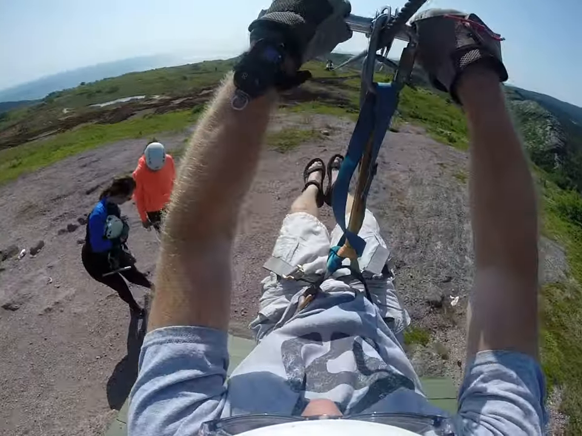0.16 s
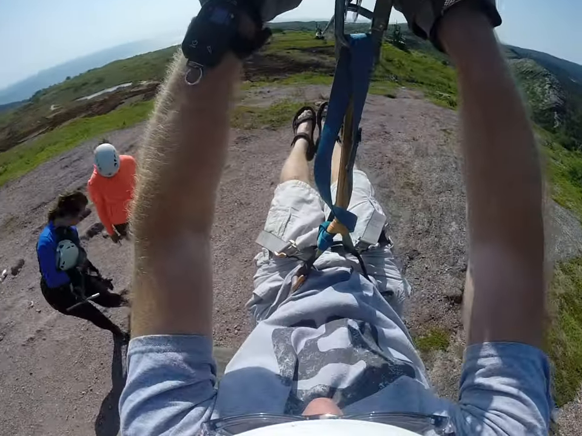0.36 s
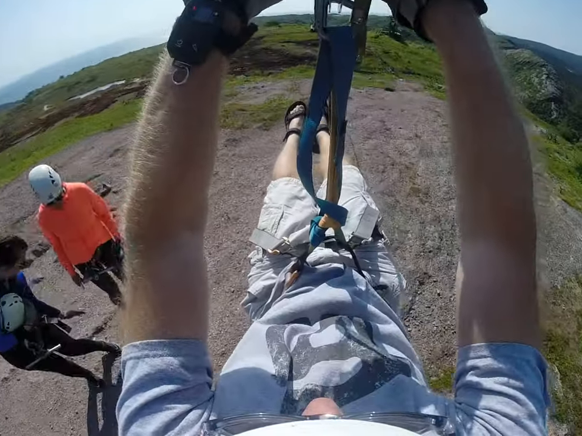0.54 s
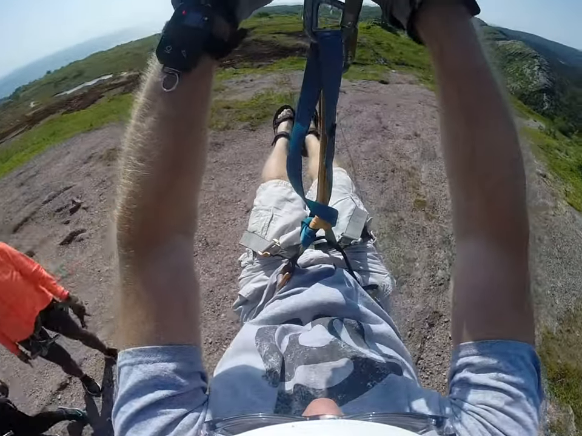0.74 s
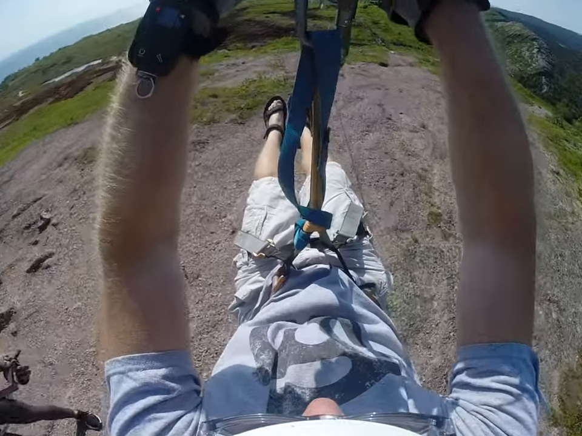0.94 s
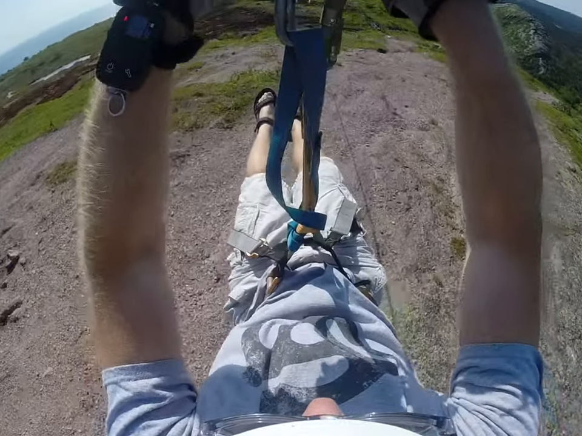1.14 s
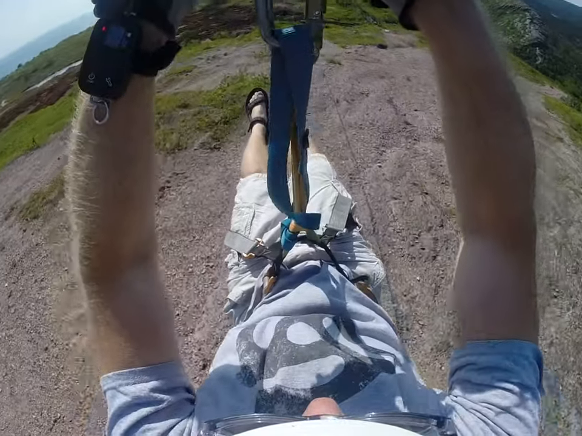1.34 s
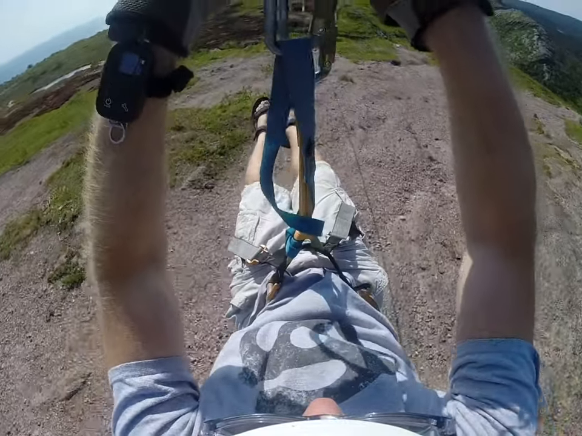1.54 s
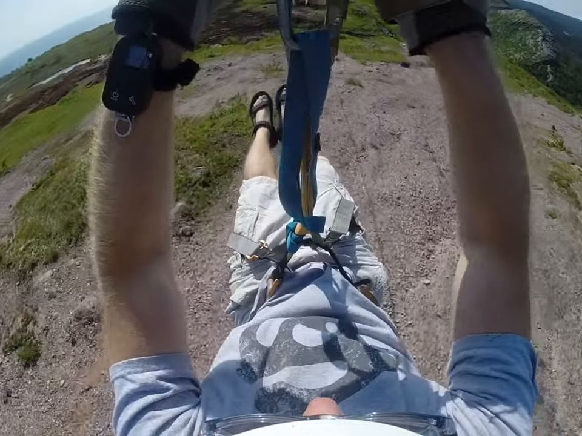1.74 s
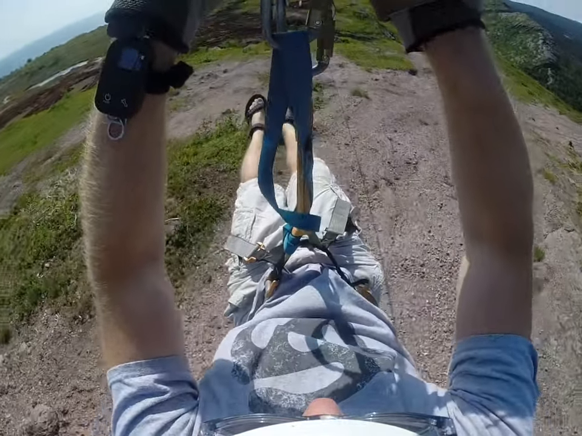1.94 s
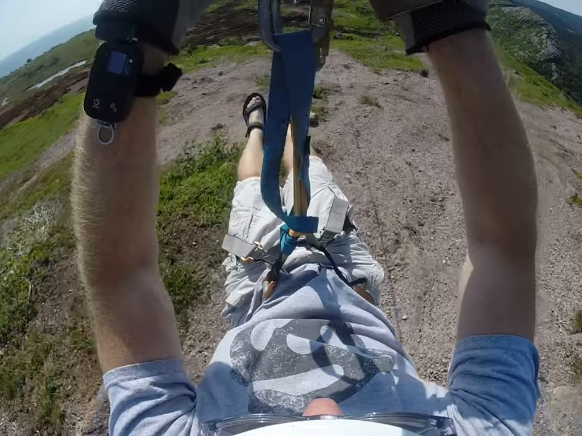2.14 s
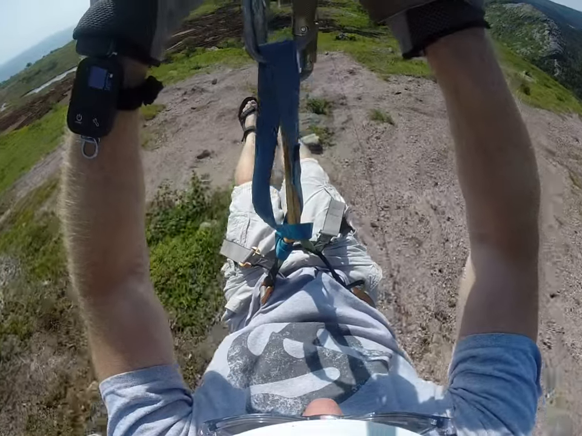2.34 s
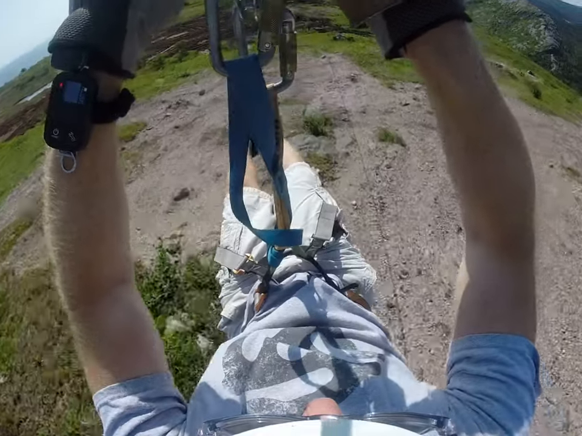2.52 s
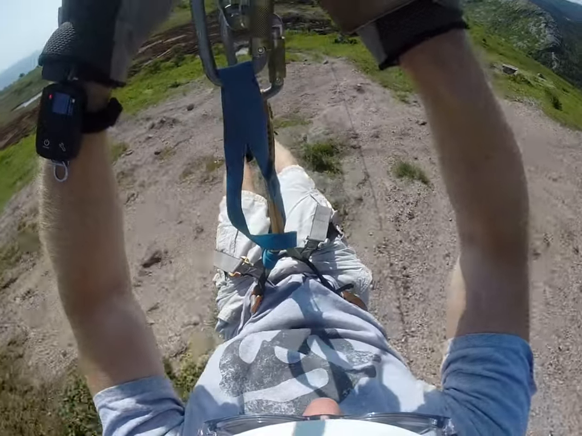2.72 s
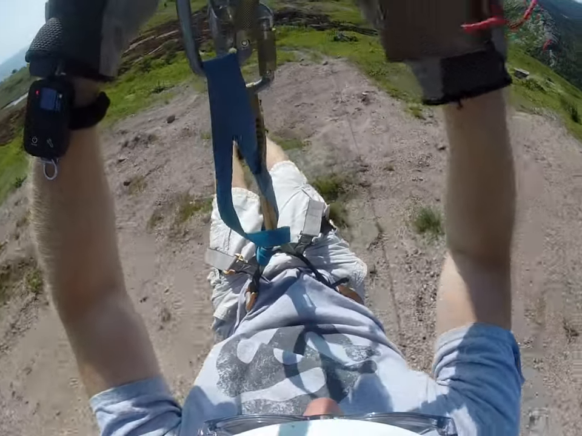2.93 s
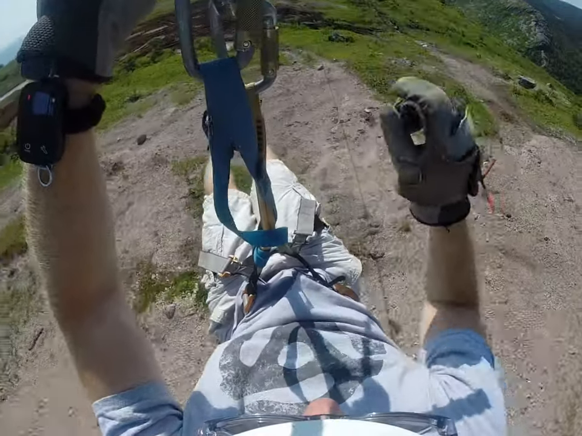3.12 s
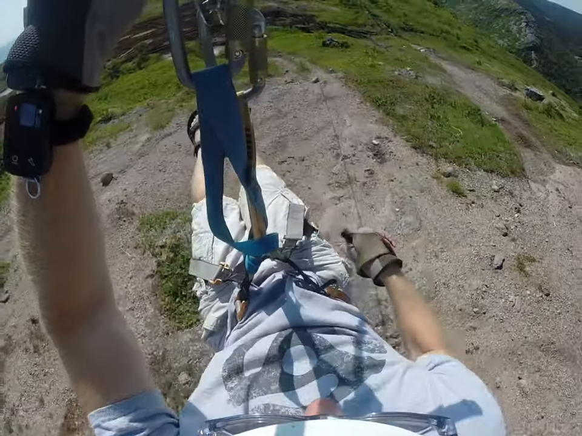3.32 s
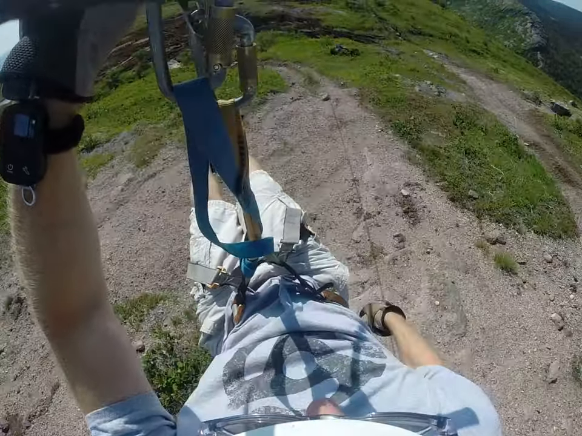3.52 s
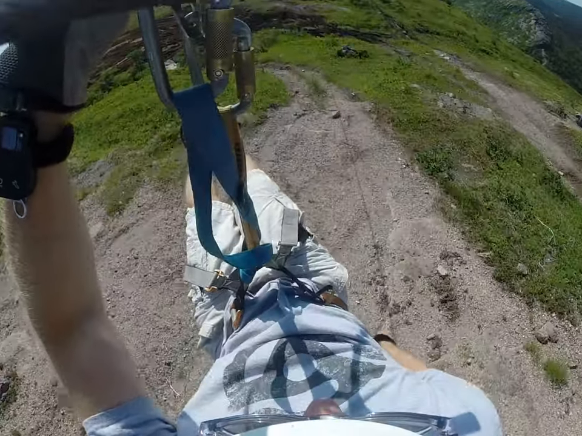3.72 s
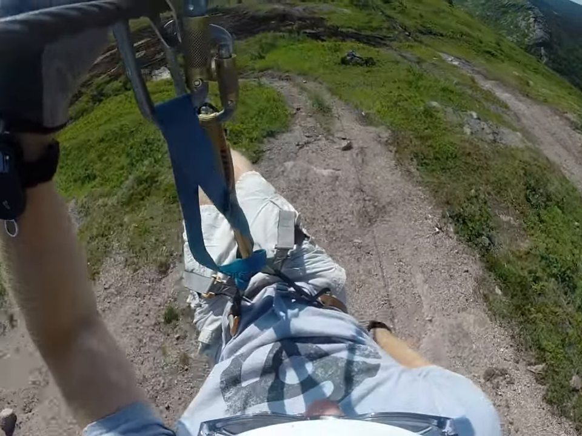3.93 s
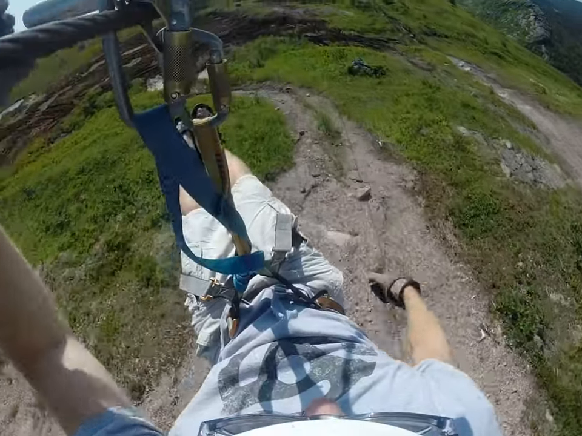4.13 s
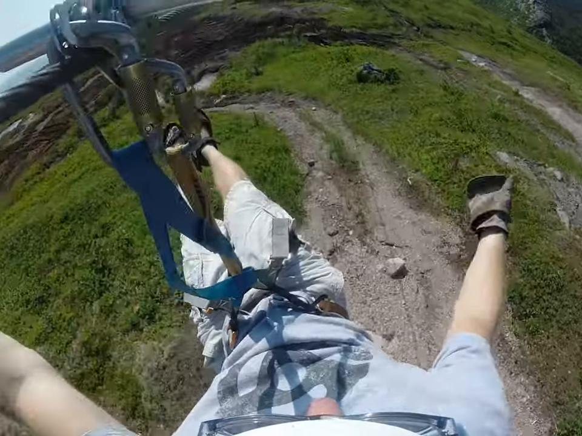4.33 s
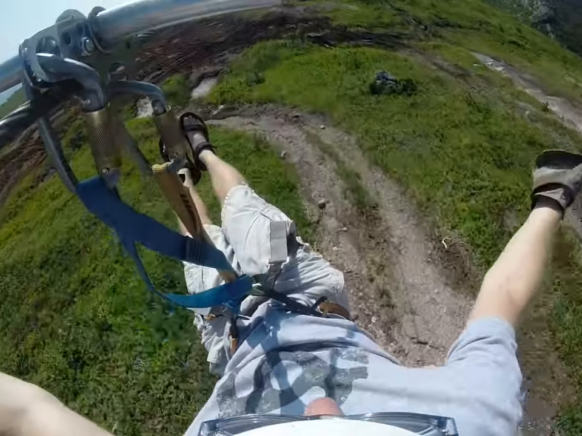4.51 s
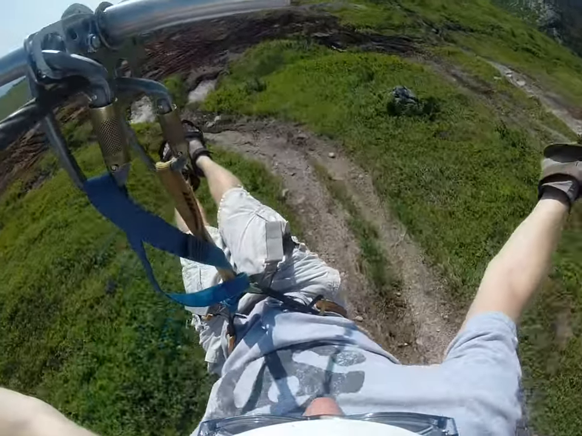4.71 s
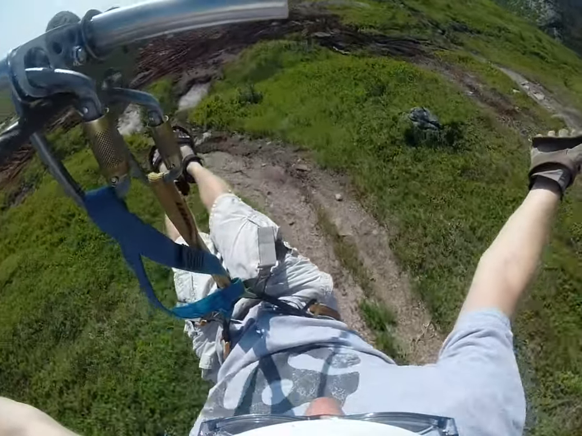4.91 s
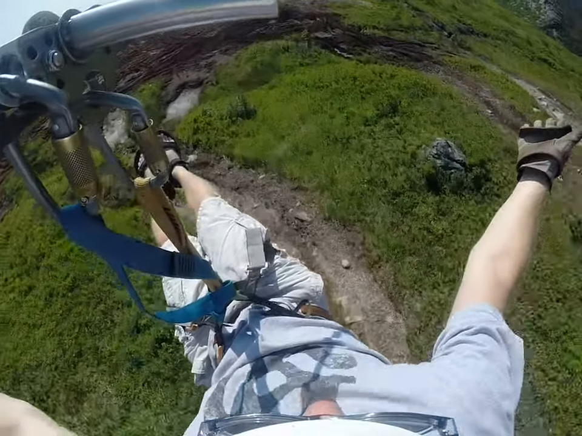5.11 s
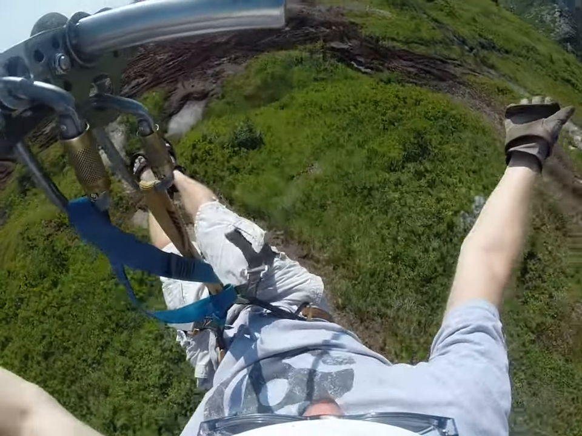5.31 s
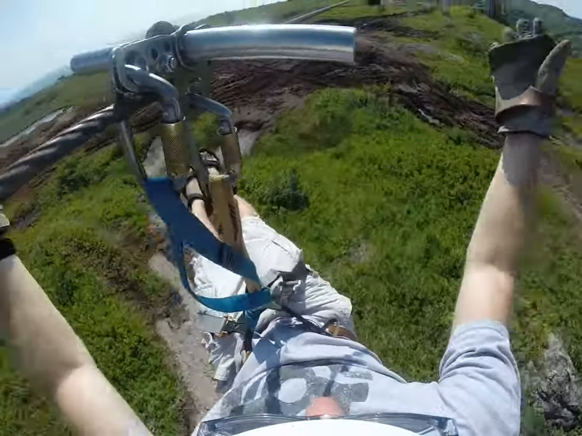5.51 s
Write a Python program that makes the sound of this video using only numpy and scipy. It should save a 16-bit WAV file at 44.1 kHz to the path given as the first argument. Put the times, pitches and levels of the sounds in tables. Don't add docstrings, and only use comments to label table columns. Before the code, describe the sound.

A rider's zip line launch, heard very close and dry: faint harness taps, a knock with a dull thud, a short scrape, then wheels accelerating over twisted cable. The bright, rattling hiss grows quickly and stays loud, changing colour as the head turns, with wind flutter beneath, a piercing whistle around the middle, and a sharp late knock.

```python
import sys
import numpy as np
from scipy import signal
from scipy.fft import rfft, irfft, next_fast_len
from scipy.io import wavfile
from scipy.ndimage import uniform_filter1d, map_coordinates

SR = 44100
rng = np.random.default_rng(int(sys.argv[2]) if len(sys.argv) > 2 else 0)


def ratio_of_db(decibels):
    return 10 ** (np.asarray(decibels, float) / 20)


def persist_wave(psi):
    counts = np.round(np.clip(psi, -1, 1) * 32767).astype(np.int16)
    wavfile.write(sys.argv[1], SR, np.atleast_2d(counts).T)


N = 245195

# start_s [s], facing [-]
HEAD_TURN = [(0, -1.5), (.4, -0.53), (.9, -0.33), (1.3, 0.062), (2.45, 0.12), (2.65, 0.3), (3.1, 0.67),
             (3.5, 1.06), (4.06, 1.4), (4.14, 1.74), (4.4, 2), (5.56, 1.85)]


def unit(x):
    return x / np.sqrt(np.mean(x ** 2) + 1e-20)


def even(x, size):
    power = uniform_filter1d(uniform_filter1d(x ** 2, size=size), size=size)
    return x / np.sqrt(abs(power) + 1e-9)


def curves(rows):
    s, *cols = np.transpose(rows)
    return [np.interp(np.arange(N) / SR, s, c) for c in cols]


def span(start, rise, stop, fall):
    return np.interp(np.arange(N) / SR, [start, start + rise, stop, stop + fall], [0, 1, 1, 0])


def swells(rows):
    t = np.arange(N) / SR
    return sum(ratio_of_db(db) ** 2 * np.exp(-((t - s) / length) ** 2) for s, length, db in rows)


def wobble(rate):
    knots = rng.standard_normal(int(N * rate / SR) + 4)
    return map_coordinates(knots, [np.arange(N) * rate / SR])


def filtered(x, response):
    m = next_fast_len(N + 8192)
    return irfft(rfft(x, m) * response(np.fft.rfftfreq(m, 1 / SR)), m)[:N]


def coloured(spectrum):
    f, db = np.transpose(spectrum)

    def response(hz):
        return ratio_of_db(np.interp(np.log(hz + 1), np.log(f + 1), db))

    return unit(filtered(rng.standard_normal(N), response))


def resonant(x, modes):
    f = np.fft.rfftfreq(4096, 1 / SR)
    power = 0
    for c, w, db in modes:
        power = power + ratio_of_db(db) ** 2 * (f * w) ** 2 / ((c * c - f * f) ** 2 + (f * w) ** 2)
    below = 1 + (modes[0][0] * 0.96 / (f + 1)) ** 16
    above = 1 + (f / (modes[-1][0] * 1.045)) ** 14
    cepstrum = irfft(np.log(power / (below * above) + 1e-14) / 2)
    cepstrum = cepstrum * np.r_[1, np.full(2047, 2), 1, np.zeros(2047)]
    ringing = irfft(np.exp(rfft(cepstrum)))
    return unit(signal.oaconvolve(x, ringing)[:N])


def wind():
    # start_s [s], level_db [dB]
    airflow = [(0, -63), (.1, -66.5), (.4, -58), (.68, -56.5), (2.0, -55), (2.5, -56), (3.3, -53.5),
               (3.8, -51), (4.0, -53.5), (4.5, -51.5), (5.06, -47.5), (5.56, -49)]
    # pitch_hz [Hz], level_db [dB per Hz]
    sway_colour = [(3, -16), (9, 5.5), (16, -3.5), (26, -10), (40, -76)]
    buffet_colour = [(18, -25), (30, -4.5), (50, -4.5), (68, -12.5), (100, -14.5), (125, -25), (170, -63)]
    flutter_colour = [(79, -8), (135, 4.5), (173, -2.5), (210, 1.5), (259, -7), (450, -18), (580, -24),
                      (990, -120)]
    rush_colour = [(210, -8.5), (350, -6.5), (571, -10.5), (808, -5.5), (1160, -8.5), (1250, -13),
                   (1620, -7.5), (2750, -120)]
    # peak_s [s], length_s [s], sway_db [dB], buffet_db [dB]
    gusts = [(.0, 0.061, -37.5, -47), (.4, 0.062, -41, -50), (0.677, .12, -33.5, -50),
             (.96, 0.14, -36.5, -48), (1.233, 0.039, -35, -46), (1.457, 0.072, -32.5, -35.5),
             (1.75, 0.14, -42, -38), (2.088, 0.1, -35, -43.5), (2.4, 0.16, -44, -42.5),
             (2.896, 0.082, -38.5, -43), (3.737, 0.11, -50, -40.5), (4.17, 0.11, -38.5, -37.5),
             (4.703, .1, -39, -40), (5.045, 0.1, -51, -35.5), (5.3, .07, -44, -38), (5.51, .07, -38, -41)]

    rush_db, = curves(airflow)
    flow_db = rush_db - rush_db.mean()
    sway_gusts = swells([g[:3] for g in gusts])
    buffet_gusts = swells([(s, length, db) for s, length, _, db in gusts])
    sway = np.sqrt(ratio_of_db(-47 + 0.12 * flow_db) ** 2 + sway_gusts)
    buffet = np.sqrt(ratio_of_db(-43 + 0.86 * flow_db) ** 2 + buffet_gusts)
    low = sway * even(coloured(sway_colour), size=9000)
    low = low + buffet * even(coloured(buffet_colour), size=5000)
    faster_db = 1 * (np.arange(N) - N / 2) / SR
    flutter_db = -54.5 + 1.08 * flow_db + faster_db + wobble(9)
    flutter = ratio_of_db(flutter_db) * coloured(flutter_colour)
    rush = ratio_of_db(rush_db + 0.24 * wobble(13)) * coloured(rush_colour)
    return low + flutter + rush


def knocks():
    hits = [
        (.034, -53, 1770, 900, 700),
        (.079, -52, 1800, 1300, 900),
        (.231, -56, 1700, 1200, 890),
        (.322, -50, 1650, 900, 900),
        (.353, -49, 1480, 900, 1100),
        (.3985, -35, 1800, 1100, 1000),
        (.405, -42, 1370, 1006, 900),
        (4.4725, -31.5, 970, 1300, 800),
        (4.474, -34, 1220, 1500, 900),
    ]
    out, t = np.zeros(N + SR), np.arange(SR // 4) / SR
    for s, db, ring_hz, puff_hz, spread_hz in hits:
        edges_hz = [puff_hz - spread_hz / 1.7, puff_hz + spread_hz / 2]
        band = signal.butter(2, edges_hz, "band", fs=SR)
        puff = unit(signal.lfilter(*band, rng.standard_normal(len(t))))
        puff = 0.53 * ratio_of_db(-60 * t / 0.041) * puff
        ring = ratio_of_db(-60 * t / 0.031) * np.sin(2 * np.pi * ring_hz * t)
        out[round(s * SR):][:len(t)] += ratio_of_db(db + 0.5) * (ring + puff)
    return out[:N]


def helmet_bumps():
    bumps = [
        (0.402, -26.5, 99, 0.11),
        (.9, -42.5, 208, 0.22),
        (.92, -36, 104, 0.22),
        (2.66, -34, 100, 0.24),
        (3.819, -38, 204, 0.33),
        (3.84, -35, 99, 0.22),
    ]
    out, t = np.zeros(N + SR), np.arange(SR // 4) / SR
    for s, db, hz, t60 in bumps:
        onset = 1 - np.exp(-t / 0.011)
        out[round(s * SR):][:len(t)] += ratio_of_db(db - 60 * t / t60) * onset * np.sin(2 * np.pi * hz * t)
    return out[:N]


def strap_scrape():
    # pitch_hz [Hz], width_hz [Hz], level_db [dB]
    strap = [(1500, 120, -11), (1800, 51, 3), (1990, 22, -2), (2340, 47, -6)]
    start_s, grab_s, drag_s, slip_db_per_s = 0.413, 0.023, 0.055, 166
    slips = ratio_of_db(1.5 * wobble(90)) * rng.standard_normal(N)
    freed_s = np.clip(np.arange(N) / SR - start_s - grab_s - drag_s, 0, None)
    drag = span(start_s, grab_s, start_s + 0.16, 0.067) * ratio_of_db(-38 - slip_db_per_s * freed_s)
    return drag * resonant(slips, strap)


def squeal():
    # peak_s [s], level_db [dB]
    flares = [(3.03, -38), (3.21, -36), (3.37, -34.5), (3.48, -31), (3.57, -31), (3.69, -41), (3.81, -34),
              (3.89, -45), (4.01, -29.5), (4.1, -31), (4.38, -51), (4.8, -43), (5.12, -48), (5.4, -46)]
    squeal_hz, ease_s, fade_s = 7080, 4.39, .05
    pitch_hz = squeal_hz + 3 * wobble(14) + 18 * wobble(90)
    whistle = np.sin(2 * np.pi * np.cumsum(pitch_hz) / SR)
    fuzz = .45 * resonant(rng.standard_normal(N), [(squeal_hz, 60, 0)])
    sing = ratio_of_db(-38) * span(2.92, .3, ease_s, fade_s)
    linger = ratio_of_db(-52) * span(ease_s, fade_s, 5.45, fade_s)
    flare_power = swells([(s, 0.026, db) for s, db in flares])
    loudness = np.sqrt((sing + linger) ** 2 + flare_power)
    return loudness * ratio_of_db(5.0) * (whistle + fuzz)


def heard(x, modes, lag_s=0):
    facing, = curves([(s + lag_s * np.clip(turn - 1, 0, 1), turn) for s, turn in HEAD_TURN])
    states = [[(m[0], m[1], 1.5 * m[2]) for m in modes]]
    for k in range(3):
        states.append([(m[0], m[1], m[2 + k]) for m in modes])
    mix = np.zeros(N)
    for k, state in enumerate(states):
        share = np.clip(1 - abs(facing + 1 - k), 0, 1)
        mix += share * resonant(x, state)
    return even(mix, size=9000)


def contact(lay, lay_db, bump_db, grit_db):
    twist = lay_db * np.cos(2 * np.pi * lay) * (1 + .5 * wobble(3.23))
    bumps = bump_db * (wobble(45) + 0.95 * wobble(14))
    return unit(ratio_of_db(twist + bumps + grit_db * wobble(500)) * rng.standard_normal(N))


def ticks(passed):
    step = np.floor(passed + .03 * wobble(300))
    strand_db = np.array([12.5, -7.0, 1, 9.5, 5.5, -4])
    height = ratio_of_db(strand_db)[step.astype(int) % 6]
    landed = np.diff(step, prepend=step[0]) > 0
    return unit(landed * height * ratio_of_db(0.82 * wobble(200)))


def jolts(twist, level_db):
    # start_s [s], peak_db [dB]
    big_jolts = [(1.4596, -25), (1.6516, -23), (1.7858, -21), (1.8277, -38), (1.8636, -34), (2.0607, -25),
                 (2.1151, -27), (2.167, -29), (2.2762, -31), (2.7471, -24), (2.9078, -23.5),
                 (3.1293, -28.5), (3.2465, -25), (3.5458, -27), (3.5883, -22), (3.703, -24), (3.9319, -34),
                 (4.0532, -23), (4.122, -29), (4.1617, -17), (4.2203, -30), (4.3954, -36), (4.6794, -26),
                 (4.7346, -26), (4.8838, -21), (5.441, -28)]
    attack_s = 0.002
    sizes = ratio_of_db(2.5 * rng.standard_normal(int(twist[-1]) + 2))
    size = sizes[np.round(twist).astype(int)]
    depth = np.interp(curves(HEAD_TURN)[0], [0, 1, 2], [1.1, .7, .4])
    burst = np.exp(2.1 * (np.cos(2 * np.pi * twist) - 1))
    gain = 0.59 * ratio_of_db(0.79 * wobble(28)) + depth * size * burst
    t = np.arange(SR // 40) / SR
    kick = t / attack_s * np.exp(1 - t / attack_s)
    for s, db in big_jolts:
        at = round(s * SR)
        gain[at:][:len(t)] += (ratio_of_db(db - level_db[at] - 18) * kick)[:N - at]
    return gain


def strand_tones(rate, passed, wheel_db):
    # pitch_hz [Hz], width_hz [Hz], level_db [dB]
    bar = [(442, 80, -65.5), (830, 126.5, -61), (998, 33, -58), (1295, 62, -52)]
    tone_db = [-0.5, -0.5, -2.5]

    def lift(f):
        return np.sqrt(sum(ratio_of_db(db) ** 2 / (1 + (2 * (f - c) / w) ** 2) ** 2 for c, w, db in bar))

    tones = np.zeros(N)
    for k, db in enumerate(tone_db, 1):
        loudness = lift(k * rate) * ratio_of_db(db + 5.0 + 2.7 * wobble(7))
        tones += loudness * np.sin(2 * np.pi * k * passed + .5 * wobble(13))
    return tones * ratio_of_db(.5 * (wheel_db - wheel_db.max()))


def trolley():
    # start_s [s], rate_hz [Hz]
    speed = [(0, 164.7), (.8, 237), (1.6, 299.1), (2.4, 360.2), (3.05, 402), (3.6, 431.8), (4.2, 458),
             (4.8, 483.8), (5.2, 498), (5.56, 504.7)]
    # start_s [s], level_db [dB]
    roll = [(0, -64.5), (.14, -60), (.5, -46), (.72, -41), (.92, -39.5), (1.12, -36), (1.5, -33.5),
            (1.75, -32), (2.1, -31), (2.65, -28), (3.3, -26.4), (3.7, -26.5), (4.12, -25.5), (4.5, -28.5),
            (4.8, -27.5), (5.25, -26.5), (5.56, -25.5)]
    # facing [-], frame_db [dB], plates_db [dB], bearing_db [dB]
    parts = [(-1, -5.5, 0, -12), (-.5, -9, 1.5, -13), (0.16, -8, -1.83, -12.5), (0.62, -8, -6.5, -15.5),
             (1.1, -7, -7, -14), (1.8, -8, -2, -12), (2.05, -7.5, -1, -11.5)]
    # pitch_hz [Hz], width_hz [Hz], then level_db [dB] at facing 0, 1, 2
    frame_modes = [(1300, 29, -8.5, -10, -20), (1490, 110, -11.5, -12.5, -19), (1644, 51, -8, -1, -10),
                   (1800, 155, -9.5, -9, -12), (2074, 33, -7, 1.5, -14), (2129, 31, -9, 2, 5.5),
                   (2260, 134, -5, -8, -5), (2507, 165, -4, -6, -13)]
    plate_modes = [(2737, 36, -2.5, -1, 6), (2837, 77, 2.5, -9.5, 0.5), (2946, 69, 0, 0, 4),
                   (3210, 270, -24, -7, -3), (3518, 79, -7, -3.5, 4.5)]
    wheel_modes = [(3940, 670, -4, -6, -12), (4490, 110, -5.5, -19, -4), (4790, 200, -2, 0, -0.5),
                   (5170, 200, 2.5, 5, -7.5), (5517, 140, -1.5, -1.5, -1.5), (6056, 138, 0.5, -4, -11),
                   (6595, 196, -7, -5, -4.5), (7367, 310, -2.5, -13.5, -6)]
    bearing_modes = [(8080, 90, 0, -0.5, -6.5), (8630, 47, -12, -2.5, 3.5), (8790, 350, -0.5, -17, -18),
                     (9255, 154, -1, 0.5, -10), (9820, 60, -23, -15, -8.5), (10270, 360, -8, -8, -15.5),
                     (11250, 330, -20, -12, -18.5), (11890, 60, -19, -1.5, -15), (11920, 70, -15, -6, -7),
                     (12700, 160, -7, -8, -14), (13440, 190, -8.5, -13, -18), (13700, 270, -17, -20, -16),
                     (14600, 200, -12, -12, -23), (15200, 220, -24, -31, -25)]

    rate, = curves(speed)
    passed = np.cumsum(rate) / SR
    twist = passed / 6
    wheel_db, = curves(roll)
    turned, = curves(HEAD_TURN)
    facing, *over = np.transpose(parts)
    frame_db, plate_db, bearing_db = [wheel_db + np.interp(turned, facing, db) for db in over]

    taps, rattle = ticks(passed), jolts(twist, bearing_db)
    frame_rub = contact(twist, lay_db=-0.5, bump_db=1.14, grit_db=0.2)
    plate_rub = contact(twist, lay_db=1.0, bump_db=1.0, grit_db=-0.6)
    wheel_rub = contact(twist, lay_db=-0.2, bump_db=0.43, grit_db=1.16)
    bearing_rub = contact(twist, lay_db=-1.7, bump_db=0.1, grit_db=2.1)

    frame = heard(frame_rub + 0.48 * taps, frame_modes)
    plates = heard(plate_rub + 0.2 * taps, plate_modes)
    wheel = heard(rattle ** 0.27 * wheel_rub + 0.053 * taps, wheel_modes, lag_s=0.24)
    bearing = heard(rattle * bearing_rub, bearing_modes)
    body = ratio_of_db(frame_db) * frame + ratio_of_db(plate_db) * plates
    running = ratio_of_db(wheel_db - 0.1) * wheel + ratio_of_db(bearing_db) * bearing
    return body + running + strand_tones(rate, passed, wheel_db)


def scene():
    harness = knocks() + helmet_bumps() + strap_scrape()
    return (wind() + harness + squeal() + trolley())[None]


def roll_off(x):
    return signal.sosfilt(signal.butter(12, 15420, fs=SR, output="sos"), x)


def record(dry):
    mix = filtered(dry[0], lambda hz: hz < 15310)[None]
    return roll_off(mix)


dry = scene()
out = record(dry)
persist_wave(out)
```